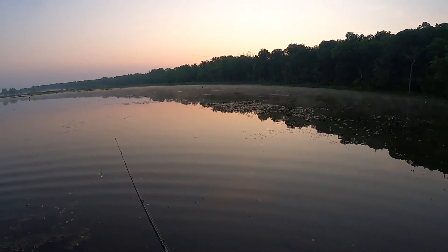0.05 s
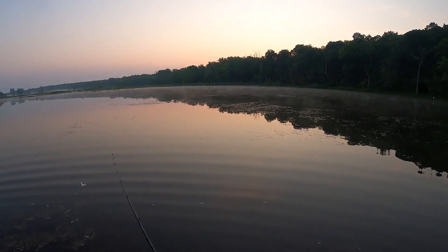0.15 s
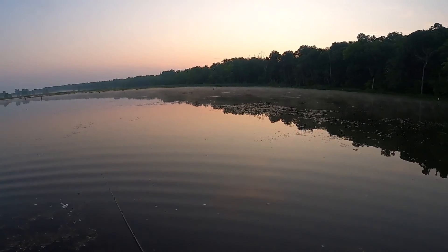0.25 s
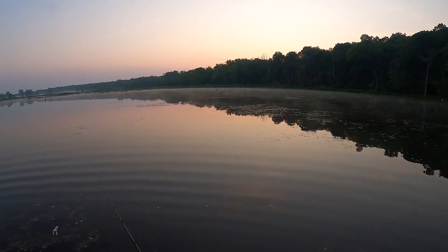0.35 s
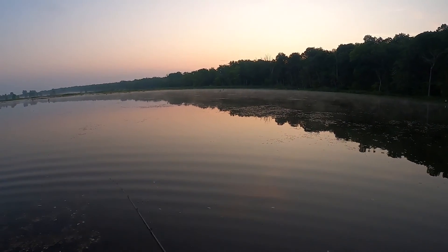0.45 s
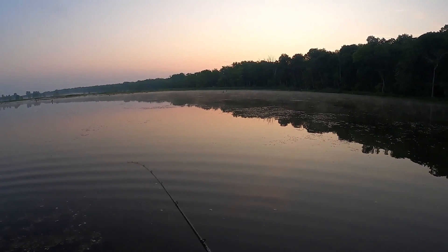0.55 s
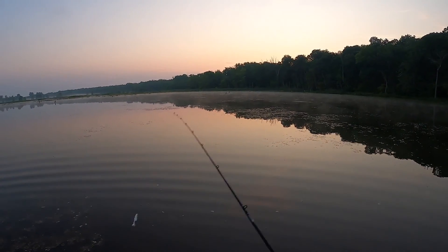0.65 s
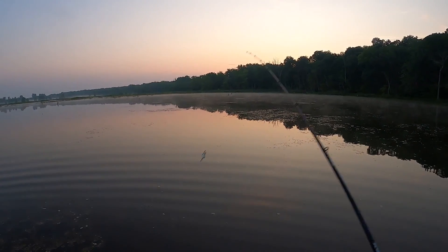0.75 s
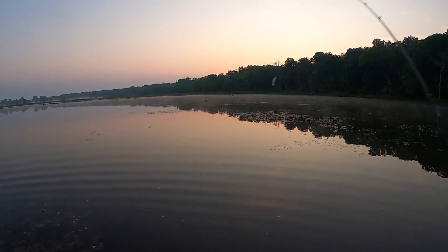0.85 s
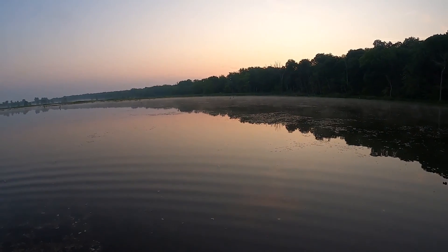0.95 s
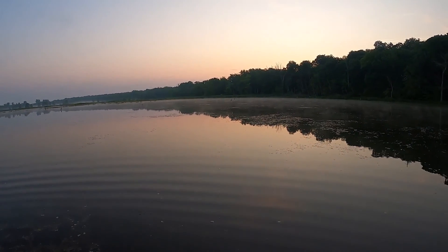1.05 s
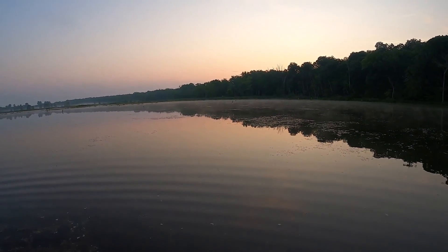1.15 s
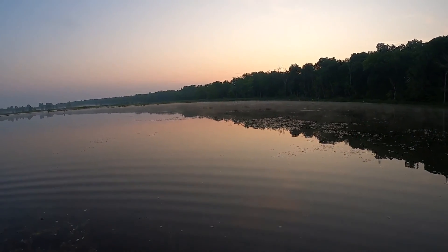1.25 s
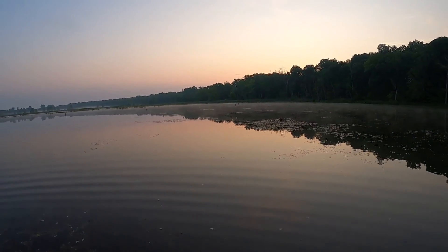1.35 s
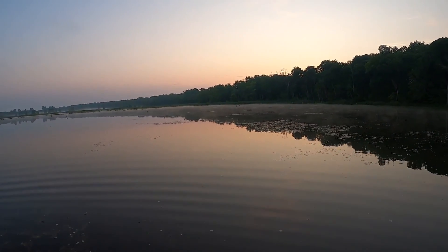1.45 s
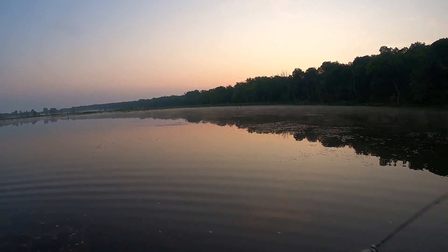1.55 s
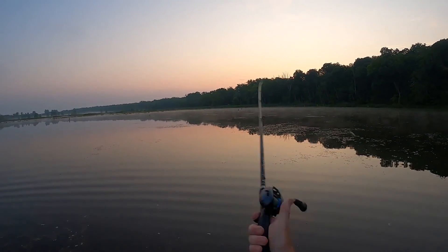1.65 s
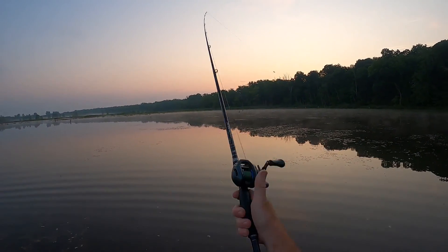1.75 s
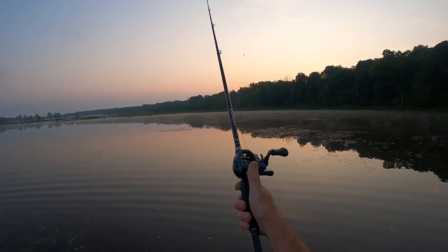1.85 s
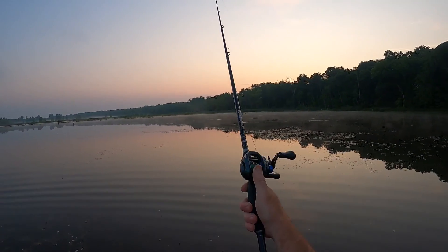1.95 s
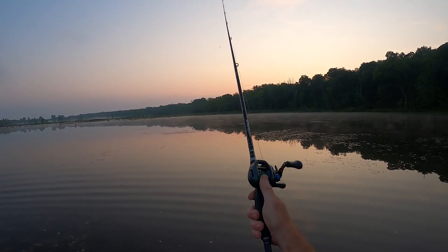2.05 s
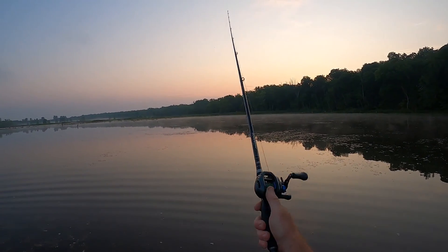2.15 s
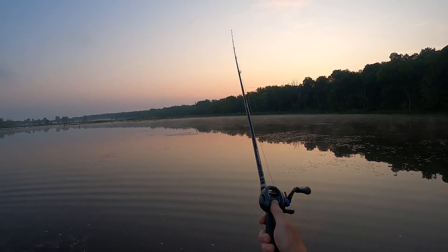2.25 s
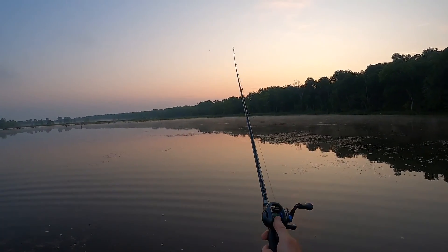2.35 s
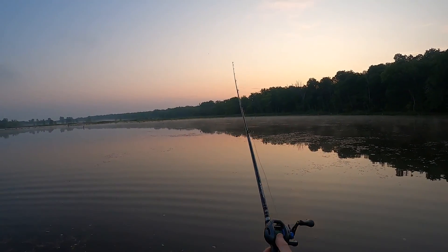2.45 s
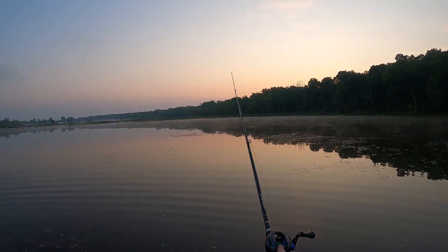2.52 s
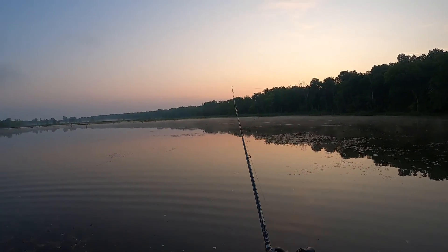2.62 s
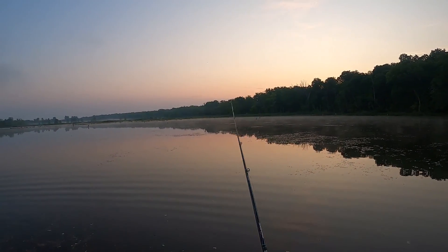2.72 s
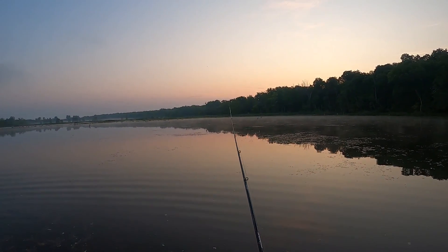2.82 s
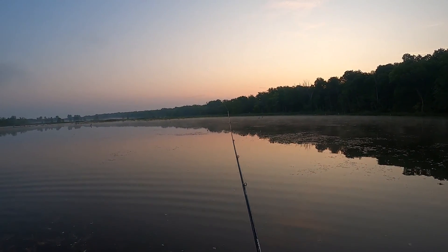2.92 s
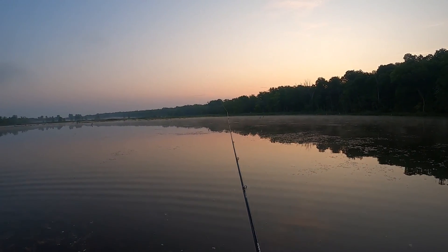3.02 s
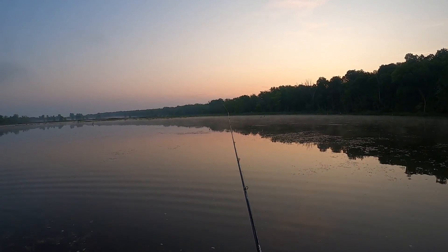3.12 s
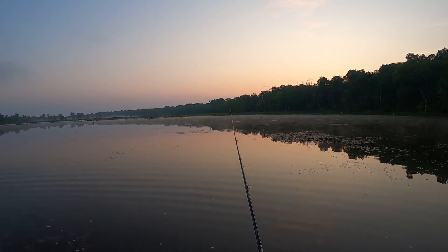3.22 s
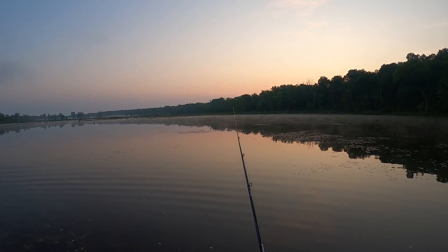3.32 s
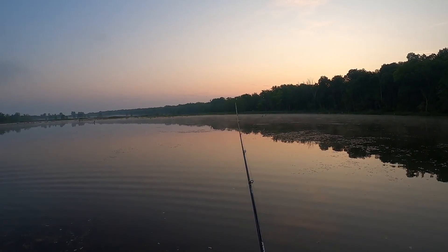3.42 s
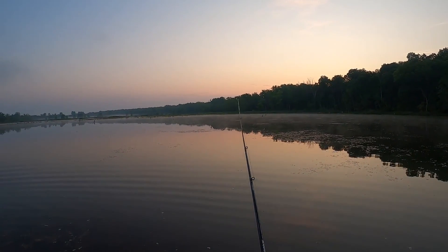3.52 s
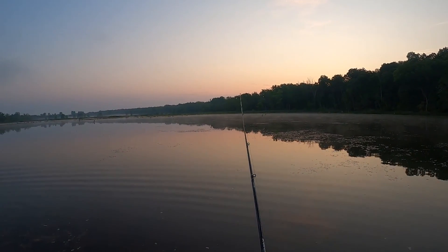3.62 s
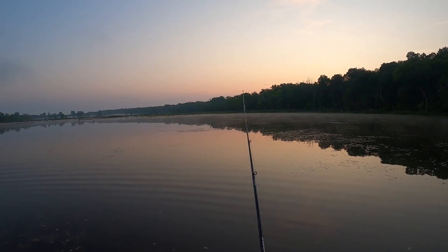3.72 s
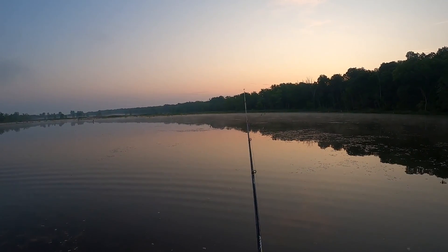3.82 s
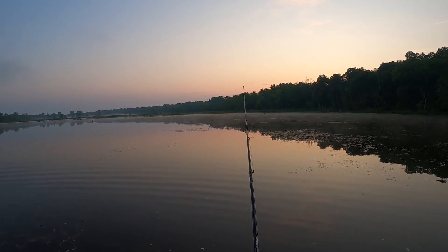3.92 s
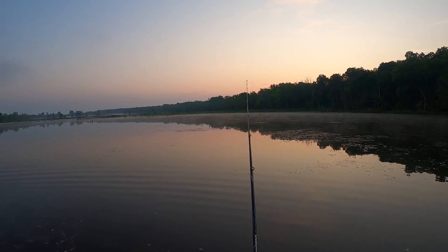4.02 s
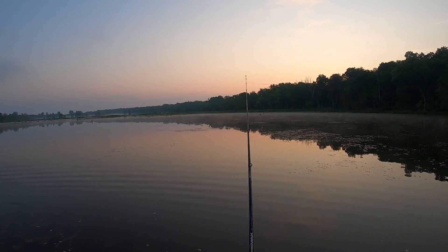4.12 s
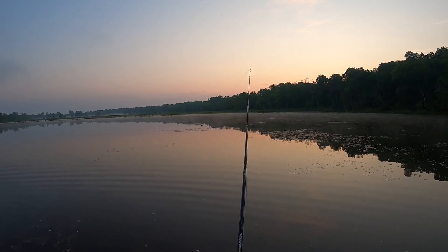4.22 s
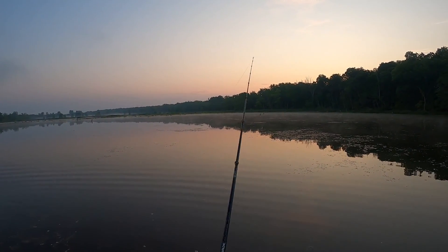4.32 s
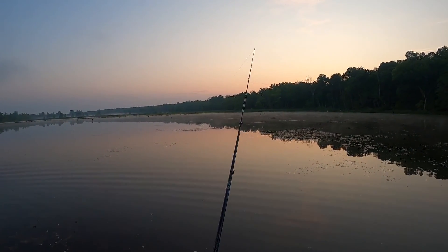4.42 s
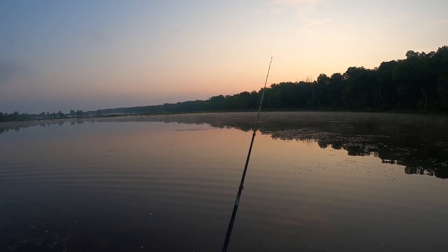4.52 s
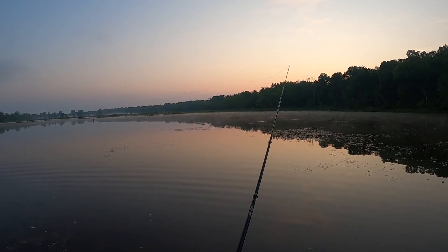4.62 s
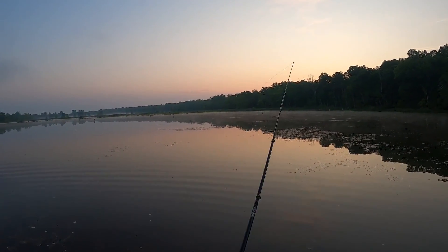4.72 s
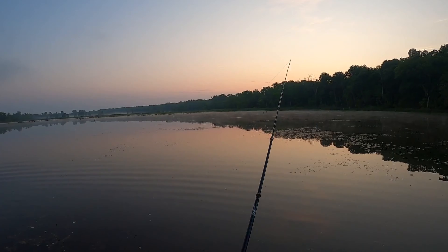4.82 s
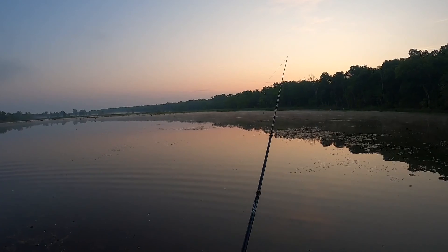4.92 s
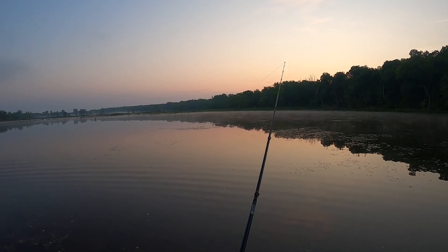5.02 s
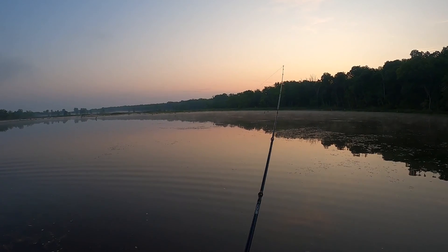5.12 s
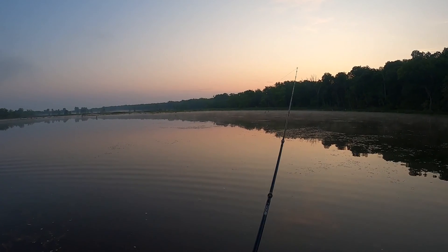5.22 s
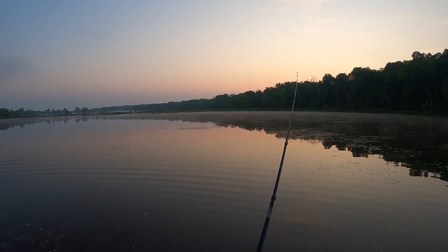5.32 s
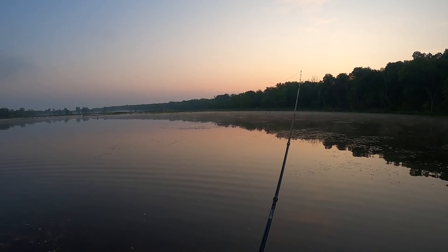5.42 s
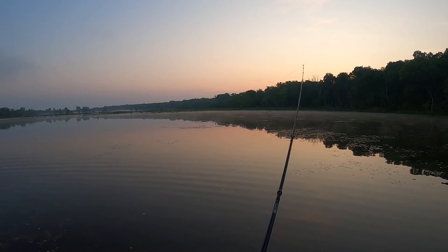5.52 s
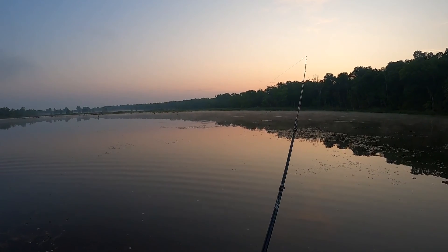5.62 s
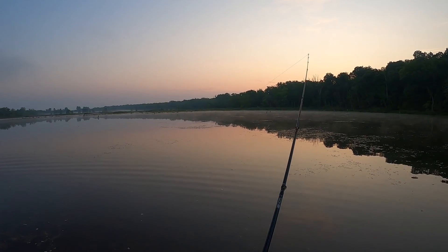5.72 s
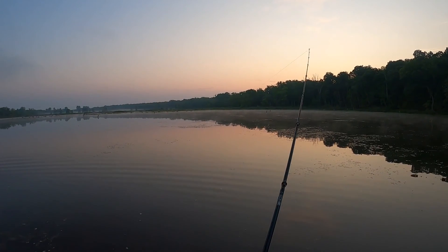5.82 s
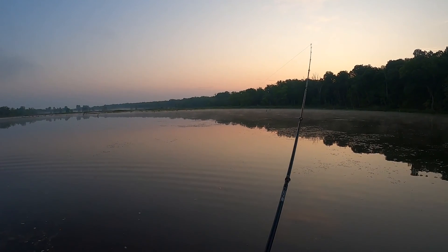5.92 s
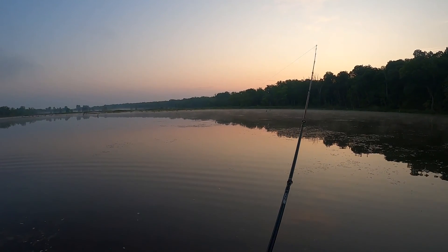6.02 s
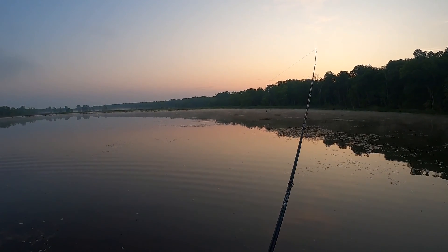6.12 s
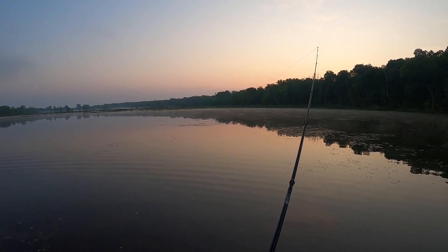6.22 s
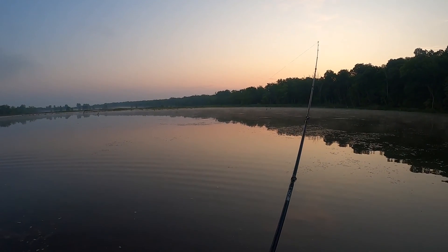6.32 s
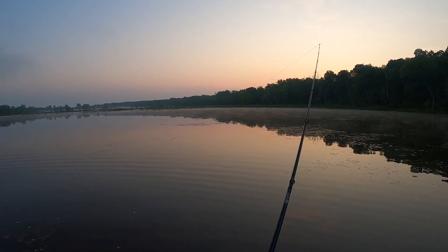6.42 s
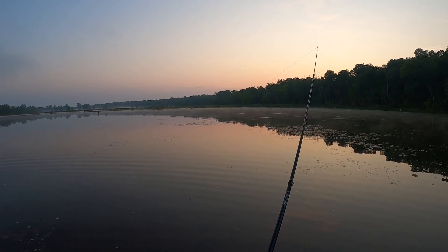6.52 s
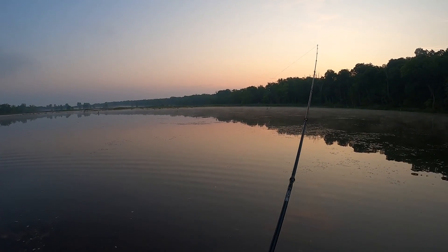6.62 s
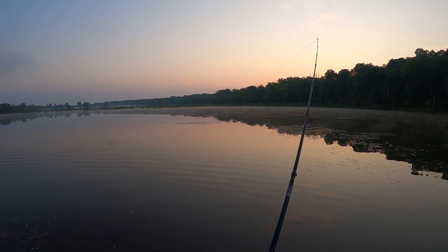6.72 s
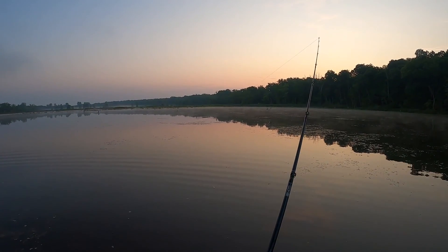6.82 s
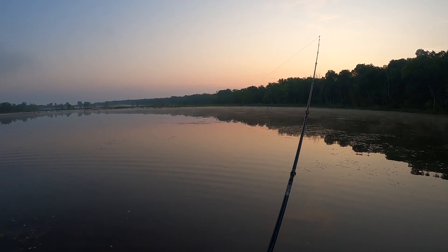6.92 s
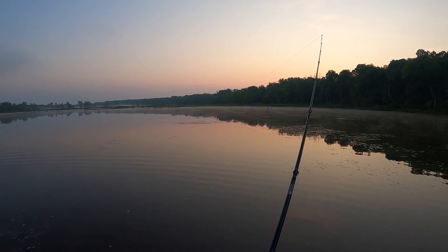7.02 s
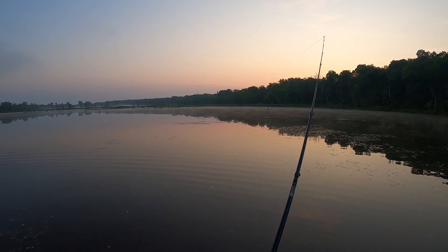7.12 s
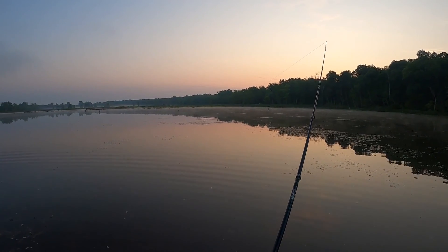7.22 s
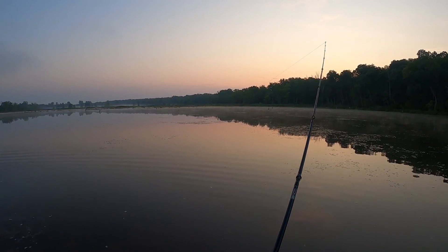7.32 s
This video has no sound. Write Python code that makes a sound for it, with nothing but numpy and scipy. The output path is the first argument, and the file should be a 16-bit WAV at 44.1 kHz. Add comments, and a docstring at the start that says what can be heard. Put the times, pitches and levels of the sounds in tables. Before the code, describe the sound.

A fishing cast with a hissing, falling spool whine, then a sharp reel click and far, hollow woodpecker tapping over low rumble.

```python
"""A cast on a still lake at dawn.

A baitcasting reel, close to the microphones of a body-worn camera. The thumb bar clicks, the rod
swishes, and the spool whines down under drag as the line hisses out; the handle snaps the gears back
in and winding starts. From the far trees come songbirds and a quick hollow ticking, like a
woodpecker's roll, over a low rumble."""
import sys
import numpy as np
from scipy import signal
from scipy.fft import rfft, irfft, next_fast_len
from scipy.io import wavfile
from scipy.ndimage import uniform_filter1d, map_coordinates

SR = 44100
rng = np.random.default_rng(int(sys.argv[2]) if len(sys.argv) > 2 else 0)


def log_audio(samples):
    """Write samples as a 16-bit WAV file to the path given in sys.argv[1]."""
    # one column per channel
    frames = np.atleast_2d(samples).T
    # limit to full scale, then quantise
    limited = np.clip(frames, -1, 1)
    pcm = np.round(limited * 32767).astype(np.int16)
    wavfile.write(sys.argv[1], SR, pcm)


N = 324699

# Tone colours. Each row: frequency in Hz, relative spectral density in dB.
RASP_SPECTRUM = [(250, -40), (500, -12), (900, -12), (1400, -4), (1800, -6.5), (2300, -.5), (3000, .5),
                 (3700, -11), (5000, -20), (8000, -62)]  # line slapping on the spool
GUIDE_SPECTRUM = [(2500, -40), (3600, -7), (4700, -2), (5450, 4), (6400, -4), (7700, -10), (9800, -9),
                  (11500, -18), (13000, -14), (15500, -33)]  # line sliding through the guides
BEARING_SPECTRUM = [(3500, -82), (5000, -28), (5400, 12), (5800, 9), (6250, -12), (6900, -1), (8000, -17)]
COIL_SPECTRUM = [(500, -12), (2300, 3), (4000, -5), (9500, -14), (15500, -38)]
BAR_SPECTRUM = [(150, -12), (500, 1), (2400, 0), (4900, -3), (6300, -19), (8600, -12), (14000, -50)]
CRACK_SPECTRUM = [(200, -19), (1600, 1), (8000, -4), (15000, -28)]  # the grit in a click
RATTLE_SPECTRUM = [(200, -4), (400, 2), (5000, -9), (14000, -40)]
GEAR_SPECTRUM = [(900, -2), (2600, -3), (3500, -20), (4600, -9.5), (5500, 2), (6300, -9), (6800, 1),
                 (7400, -15), (9500, -19), (11000, -46)]
CLOTH_SPECTRUM = [(400, 7), (2500, 4), (7000, -13), (11000, -25), (15000, -46)]
CHORUS_SPECTRUM = [(500, -26), (1900, -5), (3200, -6), (4200, -22.5), (7000, -40.5)]
RUMBLE_SPECTRUM = [(25, -29.5), (50, -3.5), (80, 1.5), (200, -11), (500, -36), (900, -82.5)]
BUFFET_SPECTRUM = [(10, -2), (40, 4), (80, -18), (200, -69)]  # air on the microphones
SHORE_SPECTRUM = [(200, 1.5), (600, -9), (1100, 0), (2000, -12), (4500, -16), (7000, -25), (11000, -44)]
THRUM_SPECTRUM = [(80, -20), (170, 0), (400, -10), (1500, -50)]  # the crank, through the grip

# The spool's hum. Each row: multiple of the spin rate, relative level in dB.
HUM_HARMONICS = [(1, 0), (2, 2.5), (3, -6), (4, -2)]
# Reel resonances that the slowing spool excites. Each row: centre and half width in Hz,
# start, end, rise and fall in seconds, level in dB.
WHINES = [(1430, 210, 2.39, 2.59, .04, .025, -64.5), (2330, 190, 2.65, 3.25, .2, .07, -74)]

# Struck bodies. Each row: frequency in Hz, relative level in dB, t60 in seconds before added damping.
FRAME_MODES = [(830, -11, .022), (1156, -6.5, .02), (1563, 0, .018), (1960, -3, .018), (2190, -7, .018),
               (2440, -3, .016), (2760, -5, .015), (3690, -9, .012), (5085, -3.5, .01), (7400, -3, .006)]
GRIP_MODES = [(185.8, 3.5, 0.077), (402, -1.5, 0.036), (900, 0, 0.014), (1357, -1.5, 0.016)]
ROD_MODES = [(328, -9, 0.022), (1142, 0.5, 0.032), (3070, -12, 0.011)]
TRUNK_MODES = [(899, -3, 0.025), (1243, 4, 0.018), (1485, 4, 0.0098), (1846, -2, .012)]

# Small impacts at arm's length. Each row: start in seconds, level in dB.
COIL_FLICKS = [(1.7377, -33), (1.7806, -38)]
BAR_SNAPS = [(0.2956, -19), (0.2972, -21), (0.301, -33), (0.3045, -34)]
GRIP_BUMPS = [(2.8108, -34), (3.431, -46)]
ROD_TAPS = [(4.7558, -31.5), (4.8032, -40)]
# Pawl and line clicks. Each row: start in seconds, level in dB, tilt in dB per octave,
# share of frame ringing.
CLICKS = [(4.066, -27, 3.5, .4), (4.078, -39, -1.5, .3), (4.3277, -45, 4, .4), (4.5076, -47, 0, .4),
          (4.6187, -44.5, 3, .4), (4.9921, -32.5, 0, .3), (5.008, -12.5, .5, .5), (5.0108, -5, .8, .58),
          (5.012, -11.5, -.3, .5), (5.0135, -12.5, -.3, .45)]

# Held sounds. Each row: start, end, rise and fall in seconds, level in dB.
COIL_LASHES = [(1.735, 1.753, .006, .004, -42), (1.815, 1.855, .015, .006, -48.5)]
CRANKING = [(5.05, 5.6, .02, .1, -76), (5.75, 7.4, .1, .1, -68.3)]  # gentle at first, then in earnest
# Swells. Each row: peak time, rise and fall in seconds, level in dB.
RUSTLES = [(.295, .012, .02, -53), (.59, .25, .035, -62), (1.1, .15, .1, -69), (4.08, .004, .012, -58),
           (4.53, .04, .06, -65)]
CHORUS_SWELLS = [(3.82, .15, .25, -68), (4.5, .1, .3, -70), (5.2, .2, .15, -65.5)]
BODY_TURNS = [(.04, .1, .1, -48), (1.73, .06, .06, -40.5), (4.85, .45, .08, -51)]

# Gliding notes. Each row: start and length in seconds, first, middle and last pitch in Hz, level in dB.
SPOOL_SQUEALS = [(1.995, .095, 1250, 1225, 1310, -43), (2.195, .04, 1240, 1235, 1250, -55)]
BIRD_WHISTLES = [(3.01, .12, 3820, 4190, 4550, -73), (3.2, 0.074, 4450, 3990, 3880, -71.5),
                 (3.25, 0.12, 4080, 4180, 4120, -73), (5.02, .14, 1825, 1795, 1846, -71),
                 (5.21, .06, 3250, 3400, 3320, -67.5), (6.665, 0.06, 3950, 4600, 5230, -76)]
SONG_SYLLABLES = [(0, .07, 4250, 3550, 2650, -76), (.105, .07, 1740, 1890, 2060, -72)]  # the nearest bird; starts count from each repeat
# One bird's falling chirps. Each entry: start in seconds.
CHIRP_TIMES = [6.725, 6.912, 7.187]

# Stereo width at the camera. Each row: time in seconds, bass side gain in dB, treble side gain in dB.
STEREO_WIDTH = [(1.2, -50, -20), (3.1, -15, -2), (4.8, 2, 1)]


def spool():
    """Close up, the freed spool spins up and coasts down; its hum, rasp and hiss fade as it slows."""
    top_speed_s, top_turns_per_s = 1.89, 338
    spin_up_s, coast_s, drag_power = .33, 1.5, 1.655
    t = np.arange(N) / SR - top_speed_s
    spin_up = np.exp(-(np.minimum(t, 0) / spin_up_s) ** 2)
    coast = (1 + np.maximum(t, 0) / coast_s) ** -drag_power
    speed = top_turns_per_s * np.maximum(spin_up * coast, .1)
    turns = np.cumsum(speed * (1 + .004 * wobble(60) + .009 * wobble(11))) / SR
    halvings = -np.log2(coast)  # each halving of the speed costs a set number of dB
    running = held(1.715, 3.95, .03, .035, db=0)  # from the release until the thumb stops the spool
    jerk = swell(1.743, .008, .012, db=5)  # the lure pulls the line taut
    pull = running * (1 + jerk) * amp(1.05 * wobble(35))  # loose coils whip through the guides
    thumb_brake = swell(3.9, .3, .1, db=-73.5)
    # a fast spool throws its coils about, a slow one barely slaps them
    regularity = np.interp(speed, [105, 170, 330], [.45, .72, .5])
    slaps = rubbing(turns, sharpness=.6, tick_share=regularity, scatter_db=2)
    sliding = rubbing(turns, sharpness=.4, tick_share=.35, scatter_db=3)
    # the bearing catches twice a turn
    catches = rubbing(2 * turns, sharpness=.5, tick_share=.9, scatter_db=1.5)
    rasp = amp(-45.8 - 14.3 * halvings) * wandering(coloured(slaps, RASP_SPECTRUM))
    hiss = (amp(-52.5 - 13.7 * halvings) + thumb_brake) * wandering(coloured(sliding, GUIDE_SPECTRUM))
    whirr = held(3.4, 3.7, 1.2, .06, db=-70.5) * running * coloured(catches, BEARING_SPECTRUM)
    tone = sum(amp(db + 3 * wobble(25)) * np.sin(2 * np.pi * k * turns + .22 * k * wobble(160))
               for k, db in HUM_HARMONICS)
    hum = unit(tone) * amp(-49.5 - 40 * halvings) * running * spin_up ** 7
    whine = sum(held(*envelope) * band(slaps, hz, width) for hz, width, *envelope in WHINES)
    return (rasp + hiss) * pull + whirr + whine + hum


def rubbing(turns, sharpness, tick_share, scatter_db):
    """Once a turn comes a slap and a scrape: a tick plus a burst of noise."""
    ticks = np.zeros(N)
    tick_at = np.interp(np.arange(1, int(turns[-1])), turns, np.arange(N))
    taps = tick_at.astype(int)[:, None] + np.arange(-7, 9)  # a sinc sets each tick between samples
    size = amp(scatter_db * rng.standard_normal((len(tick_at), 1)))
    np.add.at(ticks, np.clip(taps, 0, N - 1), size * np.sinc(taps - tick_at[:, None]))
    t = np.arange(SR // 100) / SR
    plates = rng.standard_normal(len(t)) * fade(t, .008)  # the reel's side plates ring briefly
    ticks = signal.fftconvolve(ticks / np.sqrt(np.gradient(turns)), plates)[:N]
    scrape = rng.standard_normal(N) * np.exp(sharpness * np.cos(2 * np.pi * turns))
    return np.sqrt(tick_share) * unit(ticks) + np.sqrt(1 - tick_share) * unit(scrape)


def wandering(x):
    """The colour drifts as the line wanders across the spool: slow patches of random gain."""
    spectra = signal.stft(x, nperseg=512)[2]
    patches = uniform_filter1d(rng.standard_normal(spectra.shape), size=5, axis=0)
    patches = uniform_filter1d(patches, size=16, axis=1)
    return unit(signal.istft(spectra * amp(1.5 * unit(patches)), nperseg=512)[1][:N])


def squeal():
    """Near top speed the spool sings briefly on one note, then once more, faintly."""
    track = np.zeros(N)
    for start, *note in SPOOL_SQUEALS:
        add(track, start, whistle(*note, waver=.006))
    return track * amp(wobble(70))


def coils():
    """Loose coils flick the guides and lash the rod in bursts; at last the slack line ticks."""
    track, t = np.zeros(N), np.arange(SR // 30) / SR
    for start, db in COIL_FLICKS:
        add(track, start, amp(db) * fade(t, t60=.011) * noise(COIL_SPECTRUM, len(t)))
    slack = held(4.1, 4.66, .02, .03, db=-80) * patter(COIL_SPECTRUM, per_second=140, spread_db=7)
    lashes = together(held, COIL_LASHES) * patter(COIL_SPECTRUM, per_second=600, spread_db=7)
    return track + slack + lashes


def swish():
    """Rod and, far higher, thin line shed eddies whose pitch follows the speed of the swing."""
    slow_hz, fast_hz = 370, 1110
    eddy_hz = slow_hz + (fast_hz - slow_hz) * swell(1.71, .085, .07, db=0)
    phase = 2 * np.pi * np.cumsum(eddy_hz) / SR
    rod = unit(noise([(120, 2), (450, -13), (2000, -47)]) * np.cos(phase))
    line = unit(noise([(300, 3), (1300, -5), (3500, -40)]) * np.cos(8.4 * phase))
    line_level = held(1.36, 1.68, .07, .025, db=-78) * amp(12 * np.log2(eddy_hz / slow_hz))
    return swell(1.688, .021, .05, db=-38.3) * rod + line_level * line


def thumb_bar():
    """Right by the microphones, the plastic bar snaps down and frees the spool."""
    track, t = np.zeros(N), np.arange(SR // 20) / SR
    envelope = fade(t, t60=.011) * (1 - np.exp(-t / .0006))
    for start, db in BAR_SNAPS:
        add(track, start, amp(db) * envelope * noise(BAR_SPECTRUM, len(t)))
    return track


def clicks():
    """Each snap of pawl or line is a dry crunch that rings the reel frame and leaves a short rattle."""
    track, t = np.zeros(N), np.arange(SR // 5) / SR
    attack = 1 - np.exp(-t / .00015)
    crack_and_tail = .22 * fade(t, t60=.0085) + .006 * fade(t, t60=.07)
    for start, db, tilt_db, ringing in CLICKS:
        grit = noise(CRACK_SPECTRUM, len(t)) * crack_and_tail
        frame = ringing * ring(FRAME_MODES, t, scatter_db=1, damping=1.35)
        snap = (frame + grit) * attack
        tilted = filtered(snap, lambda hz: amp(tilt_db * np.log2(np.clip(hz, 400, 9000) / 3000))
                          / np.hypot(1, (hz / 11000) ** 4))  # contact time rounds off the top treble
        add(track, start, amp(db) * unit(tilted) * snap.std())
    return track


def rattle():
    """After the gears snap in, loose parts of the reel chatter and settle."""
    return swell(5.021, .002, .012, db=-42) * patter(RATTLE_SPECTRUM, per_second=700, spread_db=5)


def rod_knocks():
    """Dull bumps of the hand on the grip and hollow taps on the rod."""
    return knocks(GRIP_BUMPS, GRIP_MODES, scatter_db=1) + knocks(ROD_TAPS, ROD_MODES, scatter_db=1)


def handling():
    """Line and sleeve rustle close by; on winding in, the gears whirr and the crank thrums in the grip."""
    rustle = together(swell, RUSTLES) * amp(wobble(25)) * noise(CLOTH_SPECTRUM)
    gears = amp(.87 * wobble(29)) * noise(GEAR_SPECTRUM)
    thrum = amp(.5 + 2.5 * wobble(9)) * noise(THRUM_SPECTRUM)
    return rustle + together(held, CRANKING) * (gears + thrum)


def woodpecker():
    """Off in the trees, a roll of blows on a hollow trunk quickens and fades."""
    first_s, first_gap_s, gap_ratio = 5.9755, .0816, .987
    beat = np.arange(18)
    times = first_s + first_gap_s * (1 - gap_ratio ** beat) / (1 - gap_ratio)
    blows = zip(times, -42.2 - .2 * beat)
    return tree_echo(knocks(blows, TRUNK_MODES, scatter_db=2), wet_db=-5, t60=.7)


def songbirds():
    """From the tree line: a two-syllable song, falling chirps, single whistles and faint twitter."""
    track = np.zeros(N)
    song_start_s, period_s = 3.78, .305
    song = [(song_start_s + k * period_s + offset, *note)
            for k in range(4) for offset, *note in SONG_SYLLABLES]
    chirps = [(start, .045, 5100, 4350, 3700, -77) for start in CHIRP_TIMES]
    twitter = []
    for when, octave, glide in rng.random((70, 3)):
        hz, sweep = 2600 * 2 ** octave, .08 * (2 * glide - 1)
        twitter.append((when * N / SR, .06, hz * (1 - sweep), hz, hz * (1 + sweep), -85))
    for start, *note in song + chirps + BIRD_WHISTLES + twitter:
        add(track, start, whistle(*note, waver=.011))
    return tree_echo(track * amp(3 * wobble(50)), wet_db=-3, t60=.55)


def chorus():
    """Birds deep in the trees, heard as a wavering band of noise, and one blurred trill."""
    trill_level = held(4.43, 4.88, .03, .05, db=-73) * amp(3 * wobble(30))
    trill = trill_level * band(rng.standard_normal(N), centre_hz=2790, half_width_hz=130)
    return trill + together(swell, CHORUS_SWELLS) * amp(1.6 * wobble(12)) * noise(CHORUS_SPECTRUM)


def tree_echo(x, wet_db, t60):
    """A far sound with its echo from the tree line."""
    tail = rng.standard_normal(SR) * fade(np.arange(SR) / SR, t60)
    return x + amp(wet_db) * signal.fftconvolve(x, tail / np.linalg.norm(tail))[:N]


def lake():
    """A low rumble, air buffeting the microphones as the body turns, and the wash of the far shore."""
    draught = together(swell, BODY_TURNS)
    rumble_level = np.hypot(amp(-52.5), amp(-2) * draught) * amp(2.3 * wobble(12))
    rumble = rumble_level * wide(RUMBLE_SPECTRUM, side_db=-19)
    buffet = np.hypot(amp(-66), draught) * wide(BUFFET_SPECTRUM, side_db=-7)
    lulls = sum(swell(s, .04, .085, db=-4.4) for s in (1.38, 5.39))  # the low end dips briefly
    shore = amp(-68.5 + .58 * wobble(2.3)) * wide(SHORE_SPECTRUM, side_db=-4)
    return (1 - lulls) * (rumble + buffet) + shore


def amp(db):
    """Decibels to gain."""
    return 10 ** (np.asarray(db) / 20)


def unit(x):
    """Scale to rms 1."""
    return x / np.sqrt(np.mean(x ** 2) + 1e-20)


def add(track, start, sound):
    """Mix a sound into a track, start in seconds."""
    part = track[round(start * SR):][:len(sound)]
    part += sound[:len(part)]


def wobble(rate):
    """A smooth random curve, rate knots a second."""
    return map_coordinates(rng.standard_normal(int(N * rate / SR) + 4), [np.arange(N) * rate / SR])


def fade(t, t60):
    """Exponential decay, 60 dB down after t60 seconds."""
    return np.exp(-np.log(1000) * t / t60)


def held(start, end, rise, fall, db):
    """An envelope, timed in seconds: exponential rise, a hold from start to end, exponential fall."""
    t = np.arange(N) / SR
    return amp(db) * np.exp(np.minimum(t - start, 0) / rise - np.maximum(t - end, 0) / fall)


def swell(peak_s, rise, fall, db):
    """An envelope that rises to a peak and falls at once."""
    return held(peak_s, peak_s, rise, fall, db)


def together(envelope, rows):
    """The envelopes of a table of events, added in power."""
    return np.sqrt(sum(envelope(*row) ** 2 for row in rows))


def filtered(x, response):
    """x through a response given as a function of Hz."""
    n = x.shape[-1]
    padded = next_fast_len(n + 8192)
    return irfft(rfft(x, padded) * response(np.fft.rfftfreq(padded, 1 / SR)), padded)[..., :n]


def band(x, centre_hz, half_width_hz):
    """One flat-topped band of x, at rms 1."""
    return unit(filtered(x, lambda hz: 1 / (1 + ((hz - centre_hz) / half_width_hz) ** 4)))


def coloured(x, spectrum):
    """x shaped by (Hz, dB) points, at rms 1."""
    points_hz, db = np.transpose(spectrum)
    return unit(filtered(x, lambda hz: amp(np.interp(np.log(hz + 1), np.log(points_hz), db))))


def noise(spectrum, samples=N):
    """Noise of rms 1 with the given colour."""
    return coloured(rng.standard_normal(samples), spectrum)


def patter(spectrum, per_second, spread_db):
    """Tiny random ticks of uneven size, at rms 1."""
    ticks = (rng.random(N) < per_second / SR) * amp(spread_db * rng.uniform(-1, 1, N))
    envelope = signal.fftconvolve(ticks, fade(np.arange(SR // 100) / SR, t60=.006))[:N]
    return coloured(envelope * rng.standard_normal(N), spectrum)


def ring(modes, t, scatter_db, damping=1):
    """Damped modes of alternating sign, a little different at each blow; peak 1."""
    body = np.zeros(len(t))
    for k, (hz, db, t60) in enumerate(modes):
        gain = (-1) ** k * amp(db + scatter_db * rng.standard_normal())
        body += gain * fade(t * damping, t60) * np.sin(2 * np.pi * hz * t)
    return body / np.abs(body).max()


def knocks(blows, modes, scatter_db):
    """A series of blows on one damped body."""
    track, t = np.zeros(N), np.arange(SR // 6) / SR
    for start, db in blows:
        add(track, start, amp(db) * ring(modes, t, scatter_db))
    return track


def whistle(length_s, first_hz, middle_hz, last_hz, db, waver):
    """A rounded note gliding through three pitches, blurred by a quick waver (a share of the pitch)."""
    progress = np.linspace(0, 1, int(length_s * SR))
    glide = np.polyval(np.polyfit([0, .5, 1], [first_hz, middle_hz, last_hz], 2), progress)
    hz = glide * (1 + waver * wobble(400)[:len(progress)])
    envelope = np.sqrt(4 * progress * (1 - progress))
    return amp(db) * envelope * unit(np.sin(2 * np.pi * np.cumsum(hz) / SR))


def placed(x, pan_db, lag_us):
    """A source at the two close microphones; the left hears it pan_db louder and lag_us later."""
    sides = np.array([[1], [-1]]) / 2
    return filtered(x, lambda hz: amp(pan_db * sides) * np.exp(-2j * np.pi * hz * sides * lag_us / 1e6))


def wide(spectrum, side_db):
    """Stereo noise, mostly alike at both microphones."""
    return noise(spectrum) + amp(side_db) * noise(spectrum) * np.array([[1], [-1]])


def scene():
    """The tackle at arm's length, the birds far off, the lake all around."""
    cast = placed(spool() + coils() + squeal(), pan_db=-.5, lag_us=18) + swish()
    snaps = placed(rod_knocks() + thumb_bar() + clicks() + rattle(), pan_db=1.2, lag_us=6)
    hands = placed(handling(), pan_db=-1, lag_us=23)
    trees = placed(woodpecker() + chorus() + songbirds(), pan_db=1.9, lag_us=23)
    return cast + snaps + hands + trees + lake()


def record(dry):
    """The camera's microphones: near mono at first, widening treble first, with a faint hiss."""
    split_hz, top_hz = 1800, 15700
    mid, side = (dry[0] + dry[1]) / 2, (dry[0] - dry[1]) / 2
    times, *side_gains = np.transpose(STEREO_WIDTH)
    bass_db, treble_db = (np.interp(np.arange(N) / SR, times, db) for db in side_gains)
    bass = filtered(side, lambda hz: 1 / (1 + (hz / split_hz) ** 2))
    side = amp(bass_db) * bass + amp(treble_db) * (side - bass)
    hiss = amp(-102) * rng.standard_normal((2, N))
    return filtered(np.array([mid + side, mid - side]) + hiss, lambda hz: hz < top_hz)


dry = scene()
out = record(dry)
log_audio(out)
```